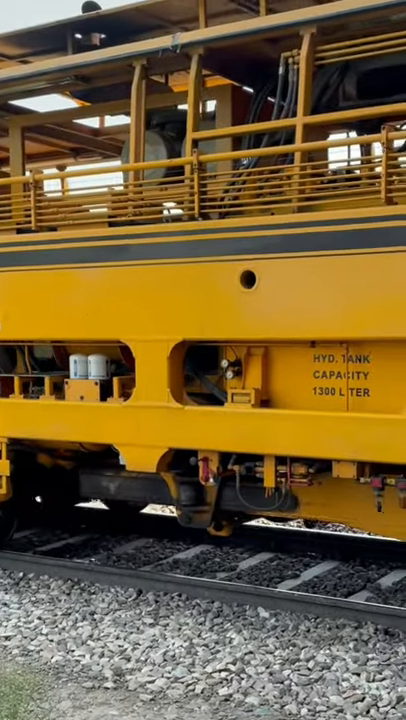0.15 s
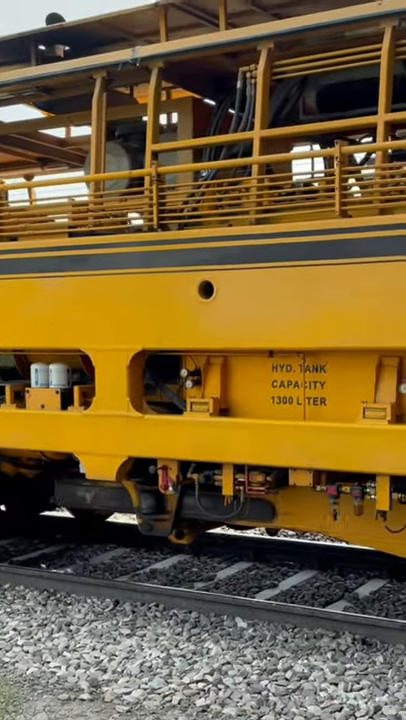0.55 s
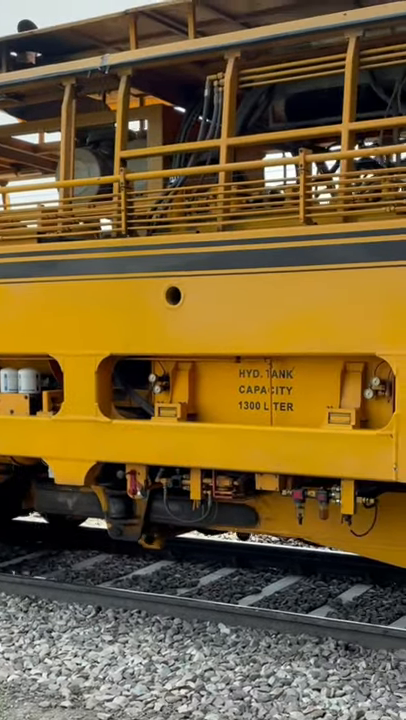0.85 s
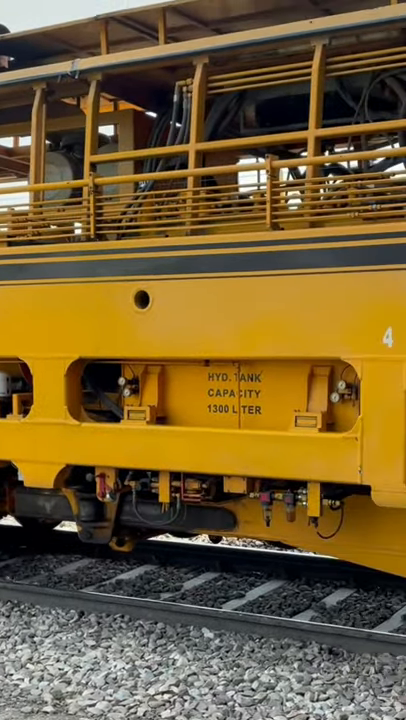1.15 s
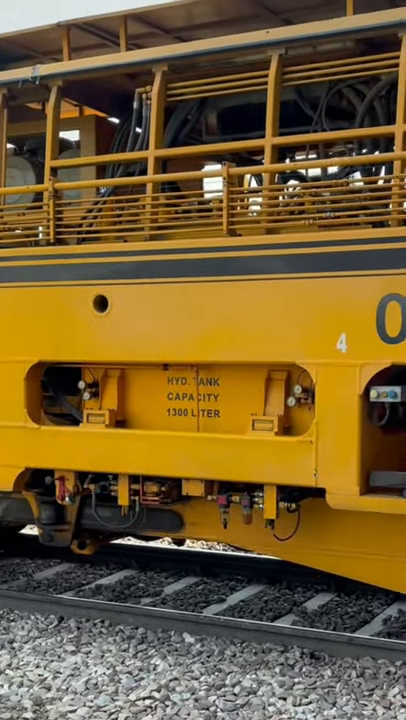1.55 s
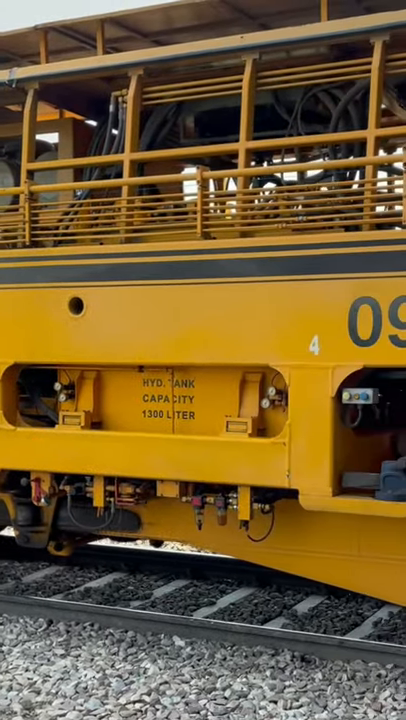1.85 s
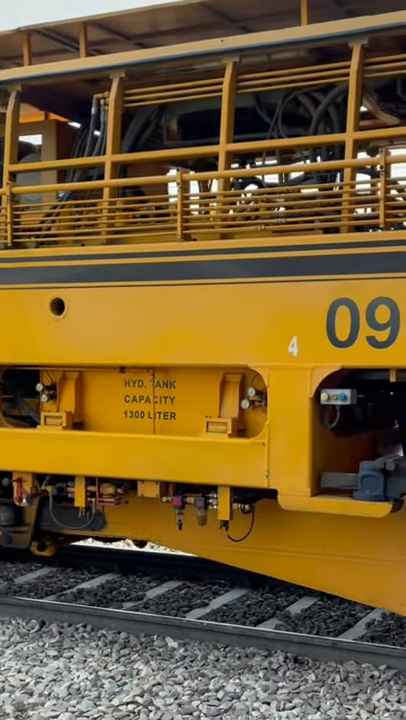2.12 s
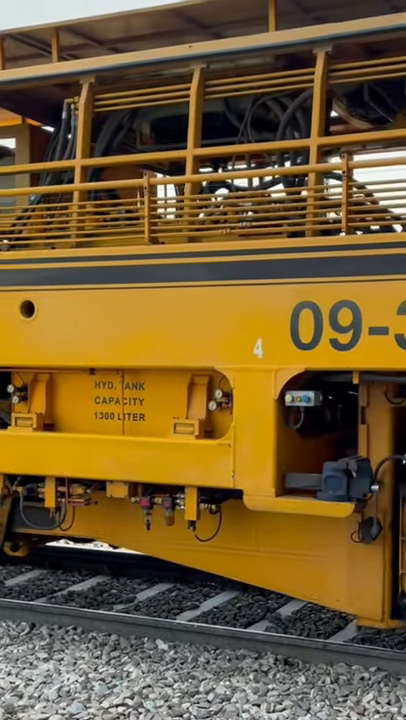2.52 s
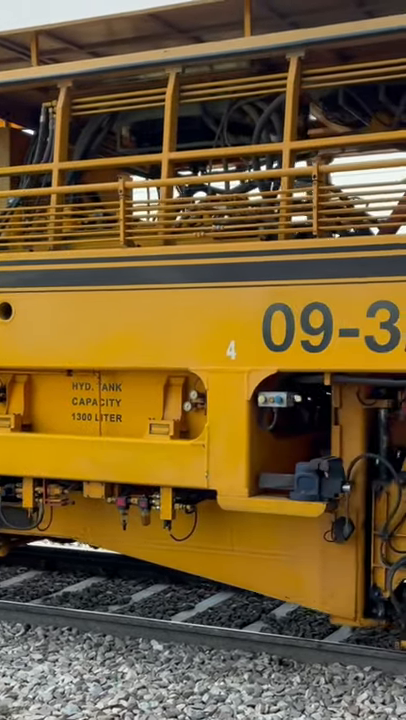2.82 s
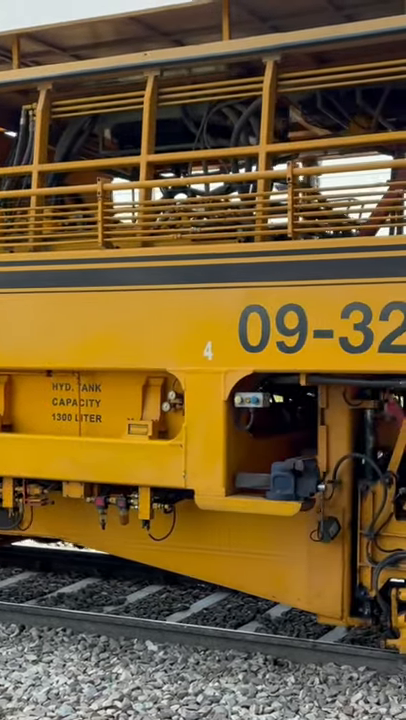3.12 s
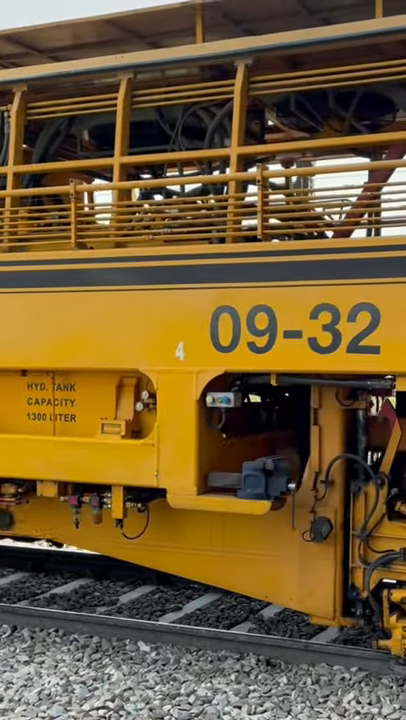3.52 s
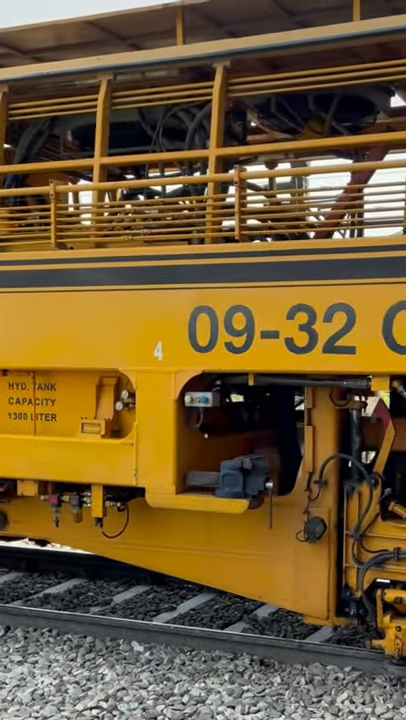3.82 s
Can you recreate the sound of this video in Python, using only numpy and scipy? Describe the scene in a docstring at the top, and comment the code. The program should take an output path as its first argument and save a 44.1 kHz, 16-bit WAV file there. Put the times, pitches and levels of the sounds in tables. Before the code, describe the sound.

A railway maintenance machine's diesel engine drones steadily a few metres away, in a dense roar of fans and machinery. Hydraulic pumps hum and ease off, gears whine, air hiss swells softly and a few dull clanks come past halfway.

```python
"""A diesel drones at working speed as a track maintenance machine creeps past a few metres away.
Exhaust orders, a geared shaft, hydraulic pump tones and gear whines stand in a dense roar of fans and
steel. The frame clanks, air hiss swells now and then and a turbocharger whistles faintly.
Stereo width varies with frequency."""
import sys
import numpy as np
from scipy import signal
from scipy.fft import rfft, irfft, next_fast_len
from scipy.io import wavfile

SR = 44100
rng = np.random.default_rng(int(sys.argv[2]) if len(sys.argv) > 2 else 0)


def dump(signal):
    """Clip the signal to [-1, 1] and save it as 16-bit WAV at the path in sys.argv[1]."""
    limited = np.clip(np.atleast_2d(signal).T, -1, 1)
    pcm = np.round(limited * 32767).astype(np.int16)
    wavfile.write(sys.argv[1], SR, pcm)


N = 175077
TONE_WAVER_HZ = 3.7
PAD_SAMPLES = 2048


def exhaust(cycles):
    """Exhaust pulses: harmonics of the engine cycle rate."""
    # order, then rms_db at 4 evenly spaced times
    orders = [(4, -48, -48, -48, -48), (6, -27, -25, -24.5, -24), (10, -38, -35, -36, -38),
              (12, -25, -27, -25.5, -29), (15, -37, -39, -42, -37), (16, -39, -34, -37, -39),
              (18, -40, -35, -35, -37), (24, -46, -44, -42, -35), (26, -35, -44, -41, -43),
              (32, -46, -45, -45, -45)]
    return tones(orders, cycles)


def shaft(cycles, turns_per_cycle=1.5234):
    """Harmonics of a shaft geared to the engine."""
    # order, then rms_db at 4 evenly spaced times
    orders = [(3, -31, -31, -33, -34), (6, -34, -33, -33.5, -33.5), (9, -41, -41, -41, -41),
              (12, -37, -33, -33.5, -24.5), (15, -42, -41, -42, -42), (18, -45, -45, -45, -45),
              (24, -45, -45, -46, -46), (30, -46, -46, -50, -43), (33, -41, -45, -48, -40),
              (36, -48, -48, -50, -50)]
    return tones(orders, turns_per_cycle * cycles)


def pumps():
    """Hydraulic pump tones of steady pitch."""
    # pitch_hz, then rms_db at 4 evenly spaced times
    pump_tones = [(66.5, -43, -43, -43, -43), (237, -37, -39, -39, -39), (303.5, -33, -34, -37, -40),
                  (550.44, -36, -34, -35.5, -36), (728.5, -48, -48, -48, -48), (825.9, -46, -46, -46, -46)]
    return tones(pump_tones, np.arange(N) / SR)


def pump_pair(in_phase_s=.6):
    """Two pumps close in pitch, beating at about 3 Hz."""
    # pitch_hz, then rms_db at 4 evenly spaced times
    pair = [(275.25, -27, -29.5, -36, -44), (278.15, -28, -28.5, -34, -38)]
    t = np.arange(N) / SR - in_phase_s
    start_turns = rng.random()
    return sum(sine(hz * t + start_turns, along(db)) for hz, *db in pair)


def pump_drone(pitch_hz=364.17, waver_db=.6):
    """The loudest pump: swells early, fades as the machine moves on."""
    # time_s, rms_db
    levels = [(0, -28), (.25, -22.5), (.5, -21), (.68, -17.5), (.9, -22.5), (1.3, -21.5), (2.0, -21),
              (2.2, -26.5), (2.55, -25), (3.0, -30), (3.97, -30)]
    rms_db = in_time(levels)[0] + waver_db * drift(TONE_WAVER_HZ)
    return sine(pitch_hz * np.arange(N) / SR, rms_db)


def roar(cycles, firings_per_cycle=6, knock_depth=.04):
    """Fan, casing and frame noise, pulsing faintly with each firing."""
    # freq_hz, density_db
    spectrum = [(30, -74), (60, -56.5), (95, -54.5), (140, -53), (190, -45.5), (250, -45), (320, -45),
                (400, -45), (500, -50.5), (800, -52), (1200, -56), (1500, -56.5), (1700, -58), (2100, -58),
                (2550, -59), (2700, -61), (3500, -66.5), (3800, -65), (4200, -70.5), (4600, -71),
                (4900, -78.5), (5500, -73), (8000, -82), (16000, -110)]
    # time_s, gain_db
    swell = [(0, 0.5), (.3, 0), (.6, -0.5), (1.1, -.5), (1.6, -0.6), (2.0, 0.2), (2.6, 0), (3.3, 0.5),
             (3.97, 0)]
    knock = 1 + knock_depth * np.sin(2 * np.pi * firings_per_cycle * cycles)
    return flickering_noise(spectrum) * amp(in_time(swell)[0]) * knock


def gear_whines():
    """Each whine is noise passed twice through a narrow resonance."""
    # pitch_hz, width_hz, then rms_db at 4 evenly spaced times
    resonances = [(1226, 8, -56, -43, -57, -37), (1387, 20, -45, -40.5, -58, -49),
                  (1701, 34, -36.5, -45, -40, -50), (2464, 7.2, -41, -47, -52, -35),
                  (2490, 11, -47, -56, -55, -58)]
    out = 0
    for hz, width_hz, *db in resonances:
        r = np.exp(-np.pi * width_hz / SR)
        poles = [1, -2 * r * np.cos(2 * np.pi * hz / SR), r * r]
        noise = rng.standard_normal(N + SR)
        ring = signal.lfilter([1], poles, signal.lfilter([1], poles, noise))[SR:]
        out = out + amp(along(db)) * ring / ring.std()
    return out


def clanks(rise_s=.003, t60_s=.07, upper_ratio=1.35):
    """Dull knocks in the frame, each ringing on two heavily damped notes."""
    # start_s, strength_db, pitch_hz
    knocks = [(2.316, -17, 1000), (2.338, -14, 1300), (2.613, -13.5, 800), (2.757, -15, 700)]
    out = 0
    for start_s, db, hz in knocks:
        t = np.clip(np.arange(N) / SR - start_s, 0, 1)
        envelope = amp(db - 60 * t / t60_s) * (1 - np.exp(-t / rise_s))
        phase = 2 * np.pi * hz * t
        out = out + envelope * (np.sin(phase) + .5 * np.sin(upper_ratio * phase))
    return out


def air_hiss(split_hz=8000, top_swell_share=.45):
    """Bright air noise with soft swells, weaker above the split."""
    # freq_hz, density_db
    spectrum = [(1500, -85), (4000, -77), (5500, -71.5), (7000, -73), (8300, -74.3), (8800, -73.3),
                (9400, -69.6), (9800, -70.3), (10200, -73), (11000, -75.8), (12000, -79.3), (13000, -81),
                (14400, -84.5), (14600, -88), (15600, -92)]
    # peak_s, rise_db, width_s
    swells = [(.21, 5, .085), (1.0, 1.5, .04), (1.42, 1.5, .1), (1.86, 4, .05), (2.12, 1.5, .06),
              (2.33, 4, .04), (2.81, 5, .085), (3.15, 2, .05), (3.46, 3, .09), (3.88, 1.5, .1)]
    # time_s, gain_db
    top_gain = [(0, .6), (1.6, .8), (2.4, -.3), (3.97, 0)]
    t = np.arange(N) / SR
    swell_db = sum(db * np.exp(-.5 * ((t - peak_s) / width_s) ** 2) for peak_s, db, width_s in swells)
    top_db = top_swell_share * swell_db + in_time(top_gain)[0]
    air = flickering_noise(spectrum)
    low = signal.sosfiltfilt(signal.butter(3, split_hz, fs=SR, output="sos"), air)
    return low * amp(swell_db) + (air - low) * amp(top_db)


def turbo(wobble_hz=9, flutter_db=2.5):
    """The turbocharger's thin, wandering whistle."""
    # time_s, pitch_hz, rms_db
    whistle = [(0, 7620, -58), (.25, 7730, -46), (.5, 7760, -49), (.75, 7850, -51), (1.0, 7740, -46),
               (1.3, 7670, -47), (1.55, 7600, -55), (1.85, 7500, -53), (2.1, 7450, -52), (2.37, 7460, -50),
               (2.7, 7330, -57), (3.3, 7450, -56), (3.6, 7630, -47), (3.97, 7750, -52)]
    hz, db = in_time(whistle)
    turns = np.cumsum(hz + wobble_hz * drift(12.5)) / SR
    return sine(turns, db + flutter_db * drift(8.0))


def stereo_image(common, left, right):
    """Sets width, phase and balance by frequency:
    centred at 1.5-2 kHz and above 13.9 kHz, opposite in phase at 9-11.4 kHz."""
    # freq_hz, coherence, left_lead_rad, left_over_right_db
    image = [(60, .999, 0, .1), (150, .995, -.03, .4), (250, .995, -.09, 1.1), (320, .99, -.17, 1.2),
             (400, .98, -.31, 1.5), (450, .96, -.43, .8), (520, .88, -.37, 0), (600, .91, -.25, .2),
             (750, .95, -.06, .2), (900, .97, -.1, -.3), (1100, .95, -.04, -2.2), (1350, .98, 0, -.4),
             (1500, .998, 0, 0), (2050, .998, 0, 0), (2400, .84, .37, -3), (3000, .74, .68, -1.4),
             (3500, .44, .5, -.4), (3800, .62, .16, 2.4), (4200, .7, .54, .2), (4600, .55, .7, .3),
             (4900, .05, .6, -1.3), (5250, .75, .04, 0), (5700, .87, .35, 0), (7000, .77, 1.37, 0),
             (8300, .77, 2.4, 0), (8800, .85, 2.8, 0), (9100, .995, 3.14, 0), (11400, .995, 3.14, 0),
             (11750, .75, 3.7, 0), (12200, .62, 4.05, 0), (13200, .6, 5.1, 0), (13700, .66, 5.7, 0),
             (13900, .99, 6.28, 0)]
    padded = np.pad([common, left, right], [(0, 0), (PAD_SAMPLES,) * 2], "reflect", reflect_type="odd")
    size = next_fast_len(padded.shape[1])
    spectra = rfft(padded, size)
    coherence, lead_rad, balance_db = at_hz(image, np.fft.rfftfreq(size, 1 / SR))
    side = np.array([[.5], [-.5]])
    shared = np.sqrt(coherence) * spectra[0] * np.exp(1j * lead_rad * side)
    own = np.sqrt(1 - coherence) * spectra[1:]
    return irfft((shared + own) * amp(balance_db * side), size)[:, PAD_SAMPLES:PAD_SAMPLES + N]


def tones(rows, turns, waver_db=1.0):
    """Sines on multiples of a rotation, changing level as the machine moves on."""
    out = 0
    for multiple, *db in rows:
        rms_db = along(db) + waver_db * drift(TONE_WAVER_HZ)
        out = out + sine(multiple * turns + rng.random(), rms_db)
    return out


def flickering_noise(spectrum, flicker_db=.5):
    """Three independent noises of one colour, flickering in overlapping half-octave bands."""
    hz = np.fft.rfftfreq(N, 1 / SR)
    coloured = rfft(rng.standard_normal((3, N))) * amp(at_hz(spectrum, hz)[0]) * np.sqrt(SR / 2)
    band_position = np.clip(2 * np.log2(hz / 40 + 1e-9), 0, 17)
    shared_drift = .32 * drift(2.7)
    out = 0
    for k in range(18):
        band = np.cos(np.pi / 2 * np.clip(band_position - k, -1, 1)) ** 2
        out = out + irfft(coloured * band, N) * amp(flicker_db * (shared_drift + drift(11.0)))
    return out


def drift(corner_hz):
    """Slow random wander of unit spread, drawn every 40 samples."""
    r = np.exp(-2 * np.pi * corner_hz * 40 / SR)
    slow = signal.lfilter([1], [1, -2 * r, r * r], rng.standard_normal(N // 40 + 2002))[2000:]
    return np.interp(np.arange(N) / 40, np.arange(len(slow)), slow / slow.std())


def amp(db):
    return 10 ** (np.asarray(db) / 20)


def sine(turns, rms_db):
    return np.sqrt(2) * amp(rms_db) * np.sin(2 * np.pi * turns)


def along(db):
    """Evenly spaced levels, joined over the scene."""
    return np.interp(np.arange(N), np.linspace(0, N, len(db)), db)


def in_time(rows):
    time_s, *columns = np.transpose(rows)
    return [np.interp(np.arange(N) / SR, time_s, c) for c in columns]


def at_hz(rows, hz):
    freq_hz, *columns = np.transpose(rows)
    return [np.interp(np.log(hz + 1), np.log(freq_hz), c) for c in columns]


def scene():
    """The machine in stereo; engine speed drives exhaust, shaft and knock."""
    # time_s, cycle_hz (one cycle = two crank turns)
    engine_speed = [(0, 18.17), (.6, 18.19), (1.2, 18.22), (1.9, 18.25), (2.4, 18.27), (2.9, 18.23),
                    (3.4, 18.18), (3.97, 18.15)]
    cycles = np.cumsum(in_time(engine_speed)[0]) / SR
    hum = exhaust(cycles) + shaft(cycles) + pumps()
    noise, left, right = roar(cycles) + air_hiss()
    common = noise + hum + pump_pair() + pump_drone() + gear_whines() + turbo() + clanks()
    return stereo_image(common, left, right)


def record(dry):
    """Steep low-pass on the top treble."""
    cutoff_hz = 15714
    lowpass = signal.ellip(12, .5, 70, cutoff_hz, fs=SR, output="sos")
    padded = np.pad(dry, [(0, 0), (PAD_SAMPLES, 0)], "reflect", reflect_type="odd")
    return signal.sosfilt(lowpass, padded)[:, PAD_SAMPLES:]


dry = scene()
out = record(dry)
dump(out)
```